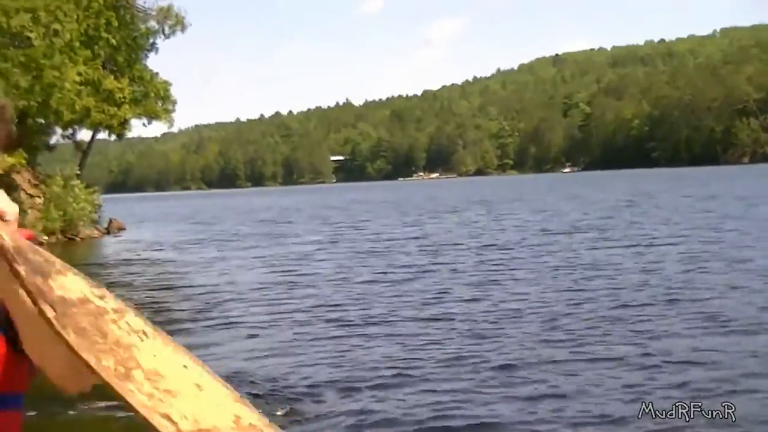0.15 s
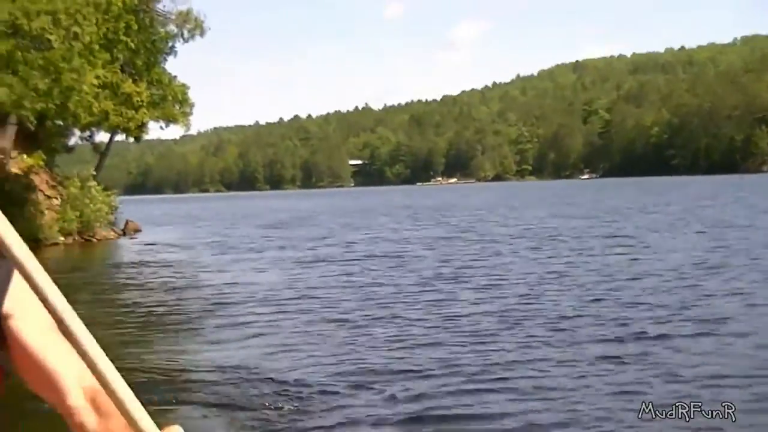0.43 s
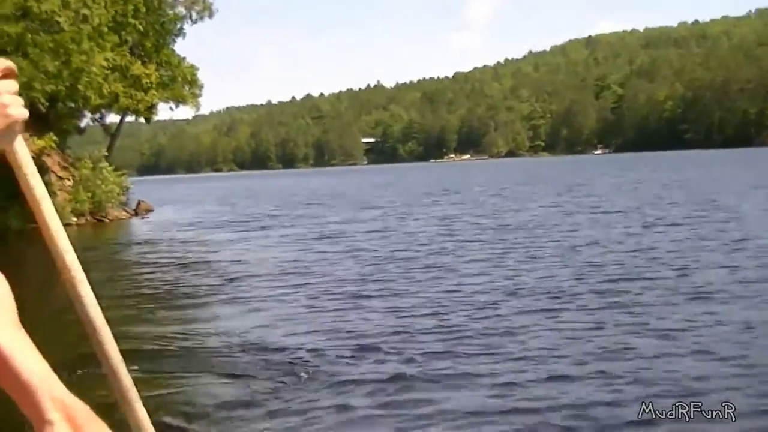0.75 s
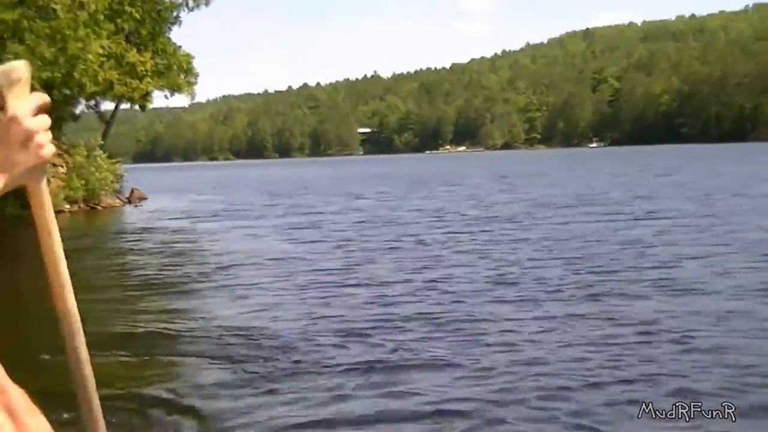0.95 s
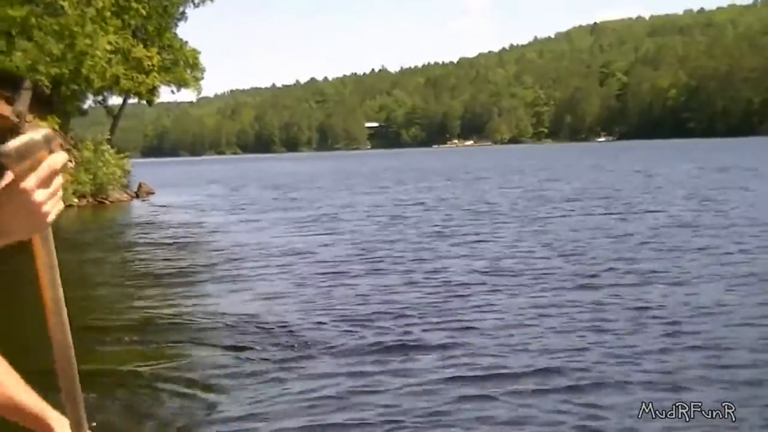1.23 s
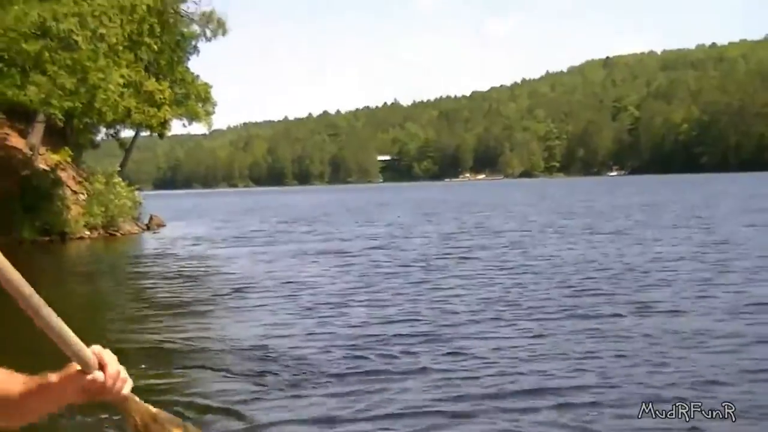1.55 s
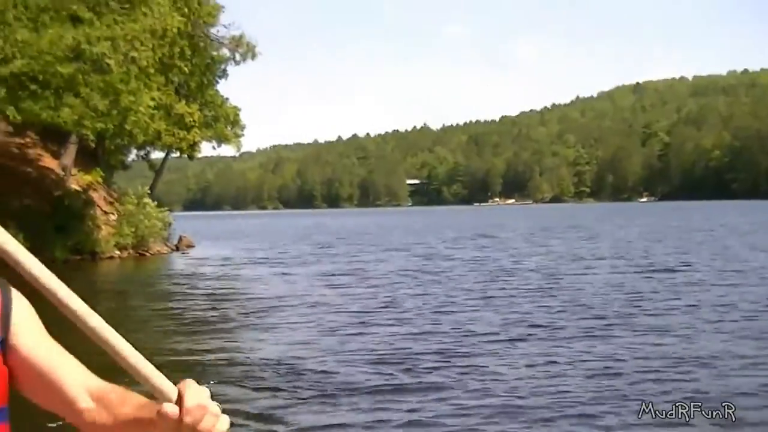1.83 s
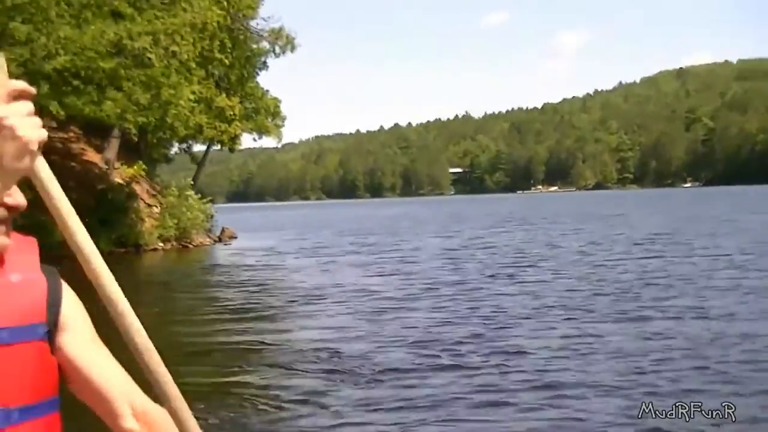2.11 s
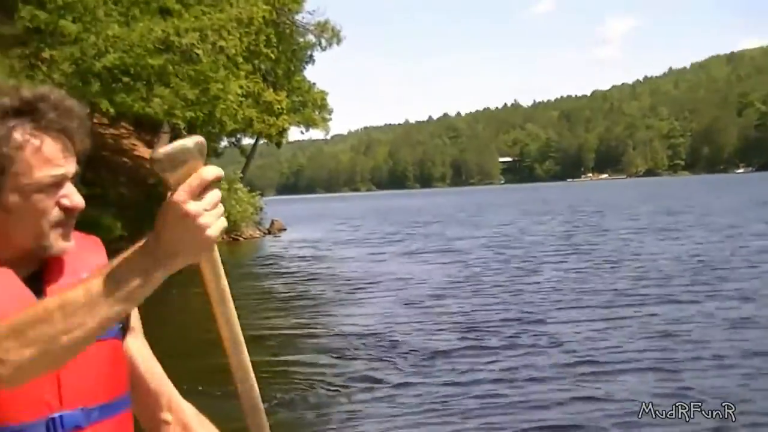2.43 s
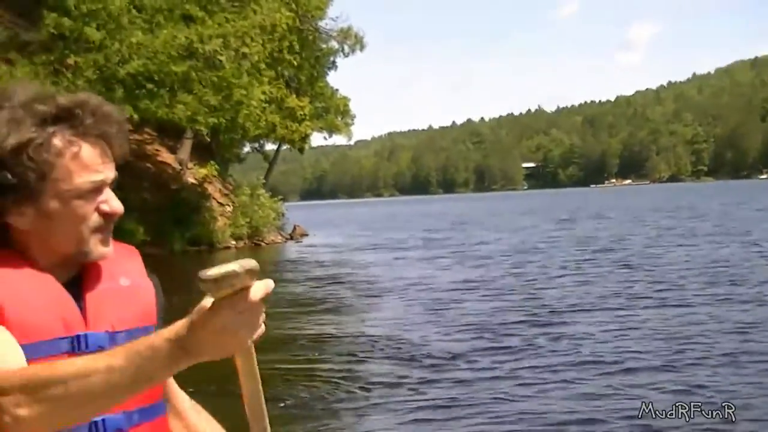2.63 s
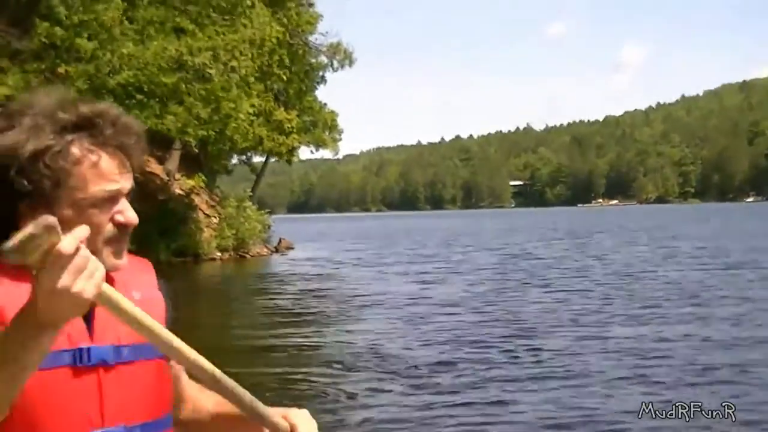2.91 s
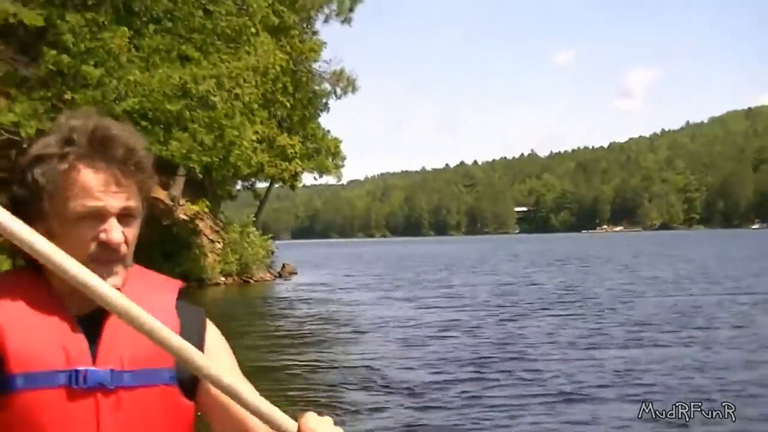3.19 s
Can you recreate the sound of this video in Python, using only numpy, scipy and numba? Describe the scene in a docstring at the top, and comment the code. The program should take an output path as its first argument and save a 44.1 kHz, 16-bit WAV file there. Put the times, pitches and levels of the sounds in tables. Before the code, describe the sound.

A paddle takes two strokes in open lake water: quiet lead-in with dull hull knocks, a gurgling swish, a dripping lull, then a second splashier stroke. Close microphone in the canoe, outdoors, with soft wind thumps.

```python
"""A paddle takes two strokes in open water, heard close by from a microphone inside the canoe.
Rising, dying sine rings make the blade's gulping air pockets, swirling bubbles, spray and drips.
Showers of tiny rings make splashes, and pairs of damped modes make dull knocks on the hull.
Smoothed noise gives gusts thumping the microphone, over a faint hiss of breeze and far ripples."""
import sys
import numpy as np
from scipy import signal
from scipy.fft import rfft, irfft
from scipy.io import wavfile
from scipy.ndimage import uniform_filter1d
from numba import njit

SR = 44100
rng = np.random.default_rng(int(sys.argv[2]) if len(sys.argv) > 2 else 0)


def pcm_store(signal):
    """Save signal as 16-bit PCM."""
    levels = np.round(np.clip(np.atleast_2d(signal), -1, 1) * 32767)
    wavfile.write(sys.argv[1], SR, levels.astype(np.int16).T)


N = 147735
T = np.arange(N) / SR  # s
NECK_CYCLES, PLOP_NECK_CYCLES = 0.17, 0.8  # time constant of the swell; large pockets pinch off slower
DRIP_RISE = 0.15  # share of pitch gained: of each drip, on average in the spray


def undb(db):
    """Decibels to gain."""
    return 10 ** (np.asarray(db) / 20)


def unit(x):
    """Scale to rms 1."""
    return x / np.sqrt(np.mean(x ** 2))


def curve(table, axis=1):
    """Gain over time from a dB column, with straight lines in dB between the rows."""
    rows = np.array(table)
    return undb(np.interp(T, rows[:, 0], rows[:, axis]))


def gain_at(table, hz):
    """Gain of a (f/Hz, level/dB) table at given frequencies, read along a log pitch axis."""
    rows = np.array(table)
    return undb(np.interp(np.log(hz + 1), np.log(rows[:, 0]), rows[:, 1]))


def noise(table):
    """Random noise coloured by a spectrum table; rms 1."""
    hz = np.arange(N // 2 + 1) * SR / N
    spectrum = rfft(rng.standard_normal(N)) * gain_at(table, hz)
    return unit(irfft(spectrum, N))


def highpass(x, hz, order=2):
    """Remove the lows."""
    return signal.sosfilt(signal.butter(order, hz, "high", fs=SR, output="sos"), x)


def burst(start, decay):
    """Sudden start, exponential fall."""
    return (T >= start) * np.exp(-np.abs(T - start) / max(decay, 1e-4))


def walk(count):
    """Slow random wander through count points over the scene; spread near 1."""
    points = rng.standard_normal(count)
    return 1.2 * np.interp(T, np.linspace(0, N / SR, count), points)


@njit
def ring(start, hz, size, t60, rise, neck):
    """Bubbles: each swells within a cycle or so, then dies away while its pitch climbs by rise."""
    out = np.zeros(N)
    for k in range(len(start)):
        first = int(start[k] * SR)
        for i in range(max(0, -first), min(int(t60[k] * SR), N - first)):
            t = i / SR
            age = t / t60[k]
            swell = 1 - np.exp(-t * hz[k] / neck)
            decay = np.exp(-6.9 * age)  # down 60 dB at age 1
            cycles = hz[k] * t * (1 + rise[k] * age / 2)
            out[first + i] += size[k] * swell * decay * np.sin(2 * np.pi * cycles)
    return out


def swarm(sizes, count, cycles, scatter_db, rise):
    """Many bubbles at random moments, a few far stronger (weaker if scatter_db < 0); rms 1."""
    when, pitch, luck, life, climb = rng.random((count, 5)).T
    lowest, highest = sizes[0][0], sizes[-1][0]
    hz = lowest * (highest / lowest) ** pitch
    rare = -np.log(1 - .98 * luck)
    size = gain_at(sizes, hz) * undb(scatter_db * rare)
    t60 = cycles * 2 ** (2 * life - 1) / hz  # from half to twice the given cycles
    return unit(ring(when * N / SR, hz, size, t60, 2 * rise * climb, NECK_CYCLES))


# push of the blade on the water, before the surges:
# [t/s, deep gurgle level/dB, small bubbles level/dB, fizz level/dB]
STIRRING = [(0, -44, -63, -64), (.11, -53, -49, -56), (.18, -62, -81, -65), (.615, -60, -57, -61),
            (.66, -42, -42, -46.5), (.79, -51, -39.5, -43.5), (.93, -40.5, -39, -46),
            (1.03, -33.5, -40, -47), (1.09, -32.5, -36, -46), (1.14, -32, -37, -46),
            (1.34, -35, -32.5, -42.5), (1.4, -39.5, -39, -47.5), (1.66, -48.5, -49, -56.5),
            (1.79, -43, -42.5, -47.5), (2.06, -54.5, -51, -58.5), (2.24, -52, -46.5, -49.5),
            (2.29, -41.5, -34.5, -47.5), (2.41, -42, -37, -45.5), (2.475, -33, -32.5, -45.5),
            (2.52, -41.5, -40, -48), (2.78, -40, -36.5, -45.5), (2.9, -45, -41, -52),
            (3.2, -49.5, -48.5, -51.5), (3.35, -47, -48, -56.5)]
# bubble sizes in the gurgle, the swirl and the spray: [f/Hz, relative level/dB]
GURGLE_SIZES = [(330, -9), (420, -4.5), (580, 3), (720, 4), (900, 3.5)]
SWIRL_SIZES = [(880, -9), (1350, -3.5), (1900, -2), (2400, -5.5), (3000, -4.5), (3700, -53)]
SPRAY_SIZES = [(3200, -0.5), (4000, -3.5), (4800, 5.5), (8300, 1), (10500, -9.5), (15000, -17)]
SURGE_DB = 2  # typical swing of the uneven flow round the blade
DROPLET_DB, CRACKLE_DB = -4, -5.5  # lone droplets and bursting foam against the fizz


def stirred_water():
    """Gurgle, small bubbles and spray follow the push of the blade and surge together."""
    gurgle = swarm(GURGLE_SIZES, count=950, cycles=24.3, scatter_db=1.0, rise=0.436)
    swirl = swarm(SWIRL_SIZES, count=4400, cycles=43, scatter_db=3.0, rise=0.15)
    fizz = swarm(SPRAY_SIZES, count=20000, cycles=28.0, scatter_db=3.5, rise=DRIP_RISE)
    droplets = swarm(SPRAY_SIZES, count=600, cycles=68, scatter_db=5, rise=DRIP_RISE)
    crackle = swarm(SPLASH_SIZES, count=450, cycles=2.4, scatter_db=3.0, rise=DRIP_RISE)
    spray = fizz + undb(DROPLET_DB) * droplets + undb(CRACKLE_DB) * crackle
    water = gurgle * curve(STIRRING, axis=1)
    water += swirl * curve(STIRRING, axis=2)
    water += spray * curve(STIRRING, axis=3)
    return undb(SURGE_DB * walk(count=130)) * water


# large air pockets that pinch off at the blade: [t/s, f/Hz, strength level/dB, ring t60/s]
POCKETS = [(.6422, 680, -19, 0.015), (0.6528, 1216, -23.5, 0.031), (0.6765, 1340, -15.5, 0.039),
           (0.6765, 1856, -10.5, 0.011), (.6954, 906, -21.5, 0.046), (.745, 1480, -27.5, 0.044),
           (0.9485, 1500, -15.5, 0.015), (0.995, 393, -24.5, 0.21), (1.0222, 686, -17, 0.055),
           (1.1291, 532, -15.5, 0.066), (1.1535, 623, -16, 0.069), (1.2878, 574, -21, 0.084),
           (1.316, 1100, -13, 0.022), (1.355, 613, -7.5, 0.021), (1.4425, 554, -24.5, 0.069),
           (1.7396, 1850, -20.5, 0.014), (2.1584, 1320, -26, 0.018), (2.2793, 1220, 2.5, 0.0072),
           (2.465, 846, -16, 0.049), (2.4781, 600, -16, 0.03), (2.556, 1760, -18.5, 0.023),
           (2.657, 830, -24.5, 0.053), (2.82, 1325, -21, 0.028), (2.9061, 657, -21, 0.033),
           (2.9168, 600, -19, 0.04)]
POCKET_RISE = 0.15  # share of pitch gained while ringing


def plops():
    """Large air pockets dragged under by the blade ring as they pinch off."""
    start, hz, db, t60 = np.array(POCKETS).T.copy()
    rise = np.full(len(hz), POCKET_RISE)
    return highpass(ring(start, hz, undb(db), t60, rise, PLOP_NECK_CYCLES), 345)


# drops falling off the blade: [t/s, f/Hz, bubble strength level/dB]
DROPS = [(0.4601, 5800, -38), (.4762, 2860, -39), (.605, 5670, -37), (0.638, 6340, -29),
         (0.95, 2920, -21.5), (1.063, 4840, -22.5), (1.068, 3110, -23), (1.3155, 2910, -18.5),
         (1.544, 4300, -23.5), (1.7836, 5950, -29), (1.907, 2340, -29), (1.944, 9600, -32.5),
         (1.9704, 3100, -30), (1.9973, 2220, -33.5), (2.0771, 4400, -31), (2.1331, 5170, -31),
         (2.2235, 6100, -27), (2.625, 4800, -23.5), (2.6592, 4600, -20.5), (3.2317, 9050, -29.5),
         (3.2397, 7200, -22.5)]
DRIP_CYCLES = 44  # cycles to fall 60 dB
TICK_DB, TICK_S = -9, 0.0019  # tick against its bubble; time constant of its fall


def drips():
    """Each drop ticks on the surface and traps one tiny ringing bubble."""
    start, hz, db = np.array(DROPS).T.copy()
    tick_envelope = sum(undb(d + TICK_DB) * burst(s, TICK_S) for s, d in zip(start, db))
    ticks = tick_envelope * noise(SPLASH_SIZES)
    rise = np.full(len(hz), DRIP_RISE)
    return ticks + ring(start, hz, undb(db), DRIP_CYCLES / hz, rise, NECK_CYCLES)


# sheets of water breaking into spray: [t/s, level/dB]
SHEETS = [(0.471, -44.5), (0.64, -42), (0.669, -33.5), (1.316, -38), (2.162, -36), (2.258, -36),
          (2.6535, -31.5), (2.778, -38), (3.29, -43)]
# droplet sizes in a splash, also the colour of foam and drip ticks: [f/Hz, relative level/dB]
SPLASH_SIZES = [(1400, 0.5), (2800, -11.5), (5000, 6.5), (8000, 3), (15000, -19)]
SPLASH_LENGTH_S = 0.023  # time to fall to 1/e


def splashes():
    """Short showers of tiny ringing droplets start at once, hold briefly and fall away."""
    shower = swarm(SPLASH_SIZES, count=16000, cycles=13.6, scatter_db=-3, rise=0.052)
    envelope = np.zeros(N)
    for start, db in SHEETS:
        envelope += undb(db) * (T >= start) * np.exp(-((T - start) / SPLASH_LENGTH_S) ** 2)
    return shower * envelope


# dull knocks on the hull: [t/s, first mode f/Hz, strength level/dB]
HULL_KNOCKS = [(0.119, 170, -18), (.396, 167, -13), (1.079, 183, -6.5)]
KNOCK_T60_S = 0.021
KNOCK_UPPER_RATIO, KNOCK_UPPER_DB = 1.46, -5  # second mode of the hull against the first


def knocks():
    """Soft blows ring two modes of the hull, damped by the water within a few cycles."""
    start, hz, db = np.array(HULL_KNOCKS).T.copy()
    t60, steady = np.full(len(hz), KNOCK_T60_S), np.zeros(len(hz))
    lower = ring(start, hz, undb(db), t60, steady, PLOP_NECK_CYCLES)
    upper_size = undb(db + KNOCK_UPPER_DB)
    upper = ring(start, hz * KNOCK_UPPER_RATIO, upper_size, t60, steady, PLOP_NECK_CYCLES)
    return highpass(lower + upper, 74)


# gusts on the microphone: [middle t/s, level/dB, spread (standard deviation) t/s]
GUST_TIMES = [(0.344, -56, 0.011), (0.664, -55, .025), (0.98, -45, 0.096), (1.141, -33.5, 0.014),
              (1.353, -30.5, 0.014), (1.644, -31.5, 0.014), (1.944, -56, 0.037), (2.737, -36, 0.029),
              (3.039, -34, 0.015), (3.262, -45, 0.026)]
# colour of the buffeting at the microphone: [f/Hz, relative density level/dB]
BUFFET_SPECTRUM = [(35, -62), (80, -8), (135, -1), (220, -0.5), (330, -9.5), (1200, -67)]
BREEZE_DB, FLUTTER_DB = -60.5, 7.5  # middle level of the flutter; its largest swing either way


def wind():
    """Low eddies thump the microphone in gusts, over a weak uneven flutter."""
    gusts = sum(undb(db) * np.exp(-.5 * ((T - middle) / spread) ** 2)
                for middle, db, spread in GUST_TIMES)
    eddies = noise(BUFFET_SPECTRUM)
    # even out the noise so that the gusts alone shape the thumps
    eddies = eddies / np.sqrt(uniform_filter1d(eddies ** 2, size=600) + 1e-6)
    flutter = undb(BREEZE_DB + FLUTTER_DB * np.tanh(walk(count=90)))
    return eddies * (gusts + flutter)


# colour of the open-water hiss: [f/Hz, relative density level/dB]
HISS_SPECTRUM = [(290, -18), (500, -2.5), (696, -2.5), (2600, -0.5), (15500, -15)]
# strength of the hiss: [t/s, level/dB]
HISS_LEVEL = [(0, -52), (.2, -48.5), (.4, -54.5), (3.35, -54.5)]


def air():
    """Soft hiss of breeze and far ripples, as steady coloured noise under a slow level curve."""
    return unit(highpass(noise(HISS_SPECTRUM), 250)) * curve(HISS_LEVEL)


def scene():
    """Paddle, water, hull and wind at one microphone in the canoe."""
    water = stirred_water() + plops() + drips() + splashes()
    return (water + knocks() + wind() + air())[None]


def record(dry):
    """The microphone chain thins the bass and cuts the top steeply at 15.7 kHz."""
    top_cut = signal.ellip(10, .2, 70, 15700, fs=SR, output="sos")
    return signal.sosfilt(top_cut, highpass(dry, 65, order=3))


dry = scene()
out = record(dry)
pcm_store(out)
```